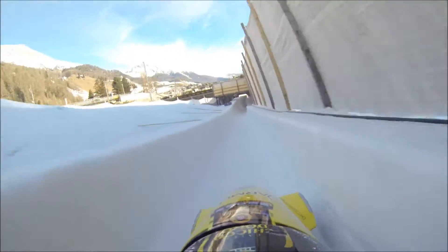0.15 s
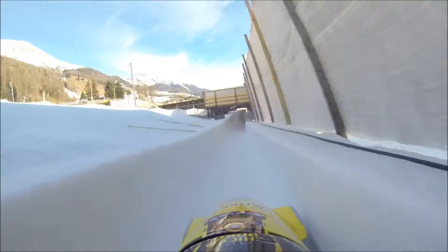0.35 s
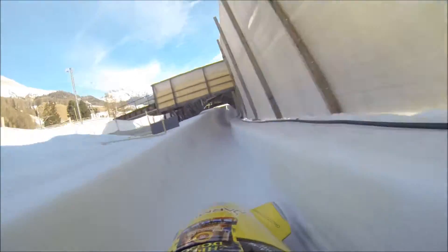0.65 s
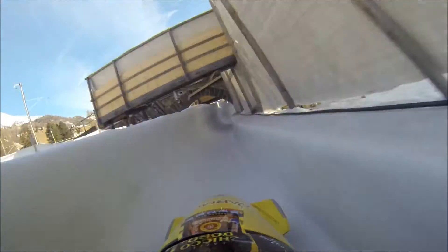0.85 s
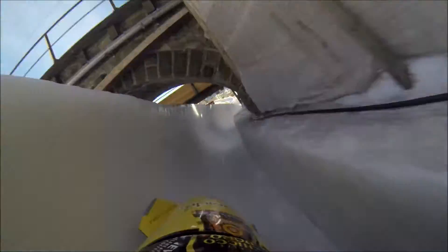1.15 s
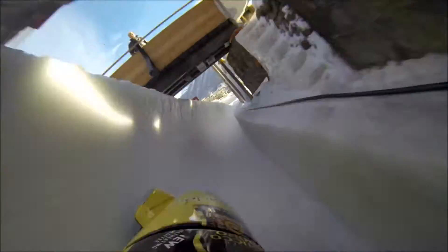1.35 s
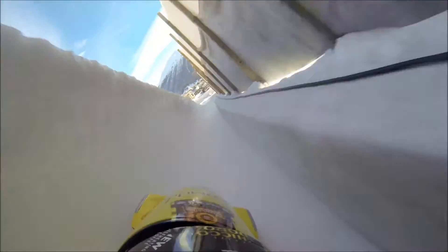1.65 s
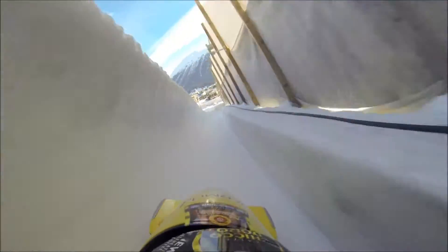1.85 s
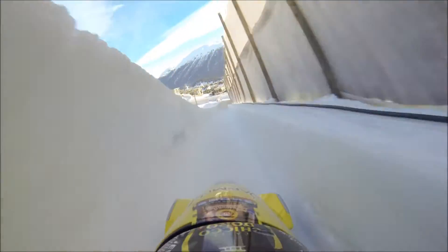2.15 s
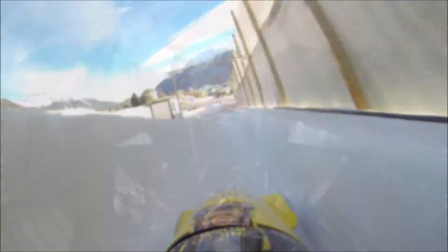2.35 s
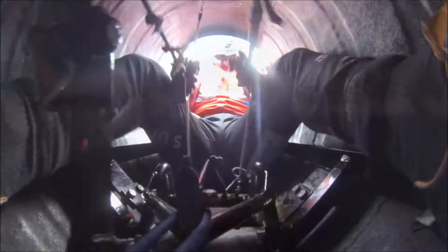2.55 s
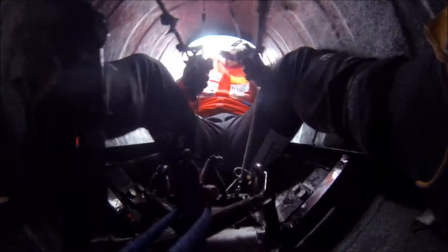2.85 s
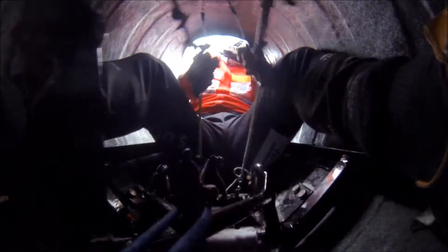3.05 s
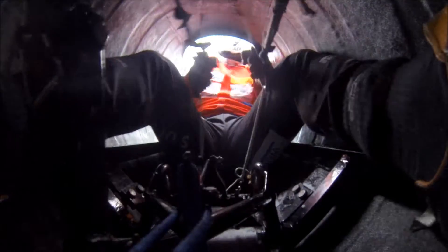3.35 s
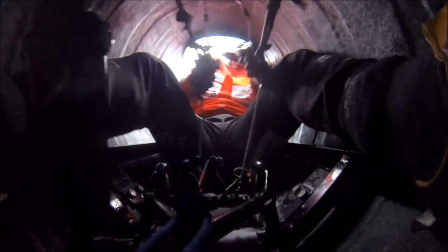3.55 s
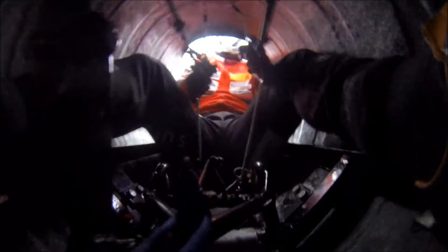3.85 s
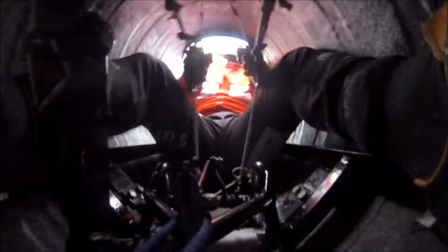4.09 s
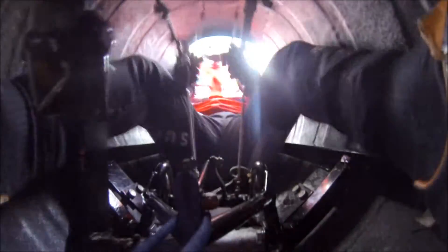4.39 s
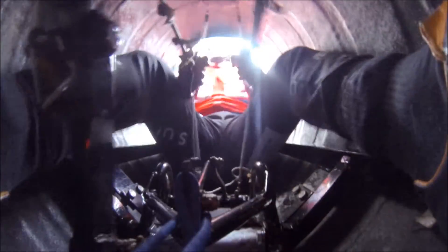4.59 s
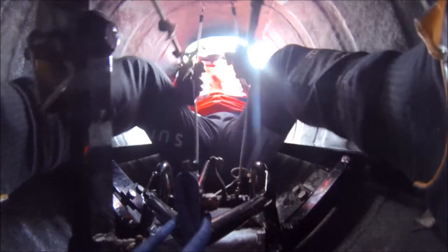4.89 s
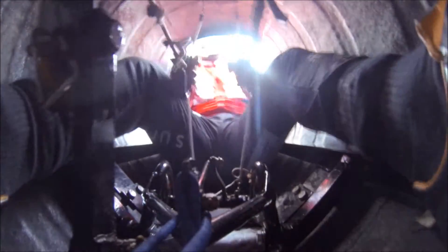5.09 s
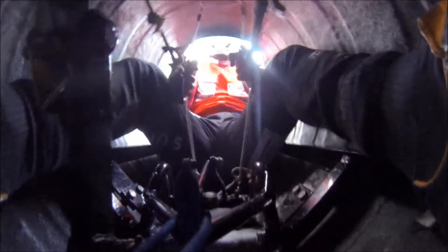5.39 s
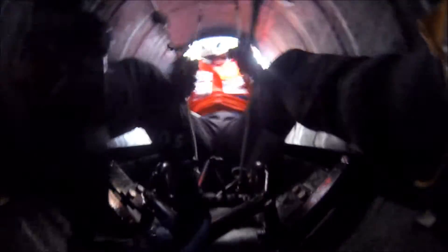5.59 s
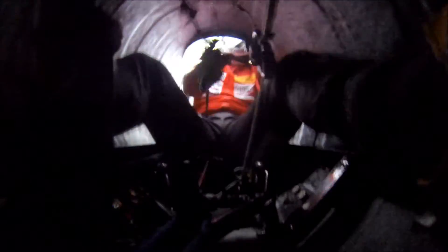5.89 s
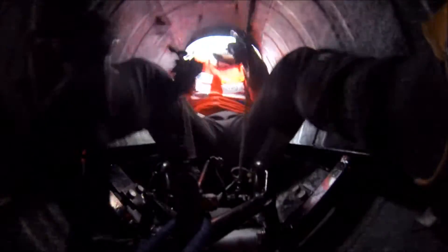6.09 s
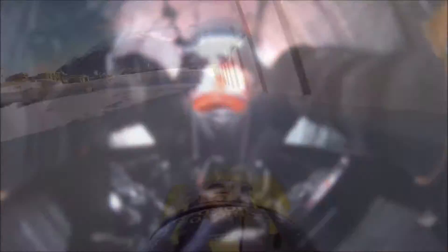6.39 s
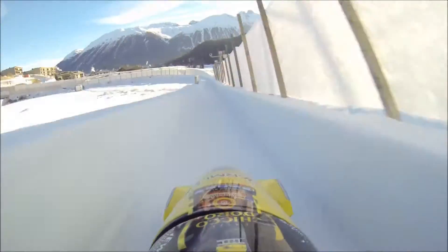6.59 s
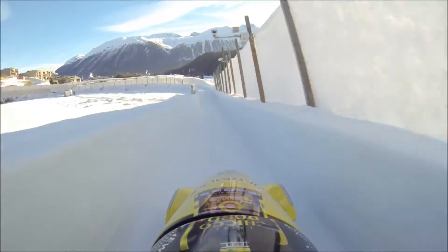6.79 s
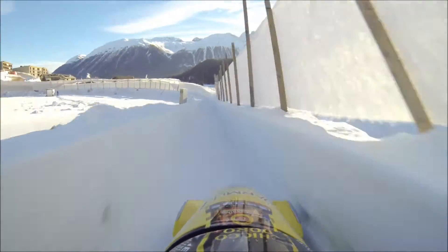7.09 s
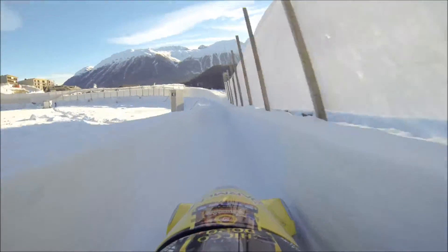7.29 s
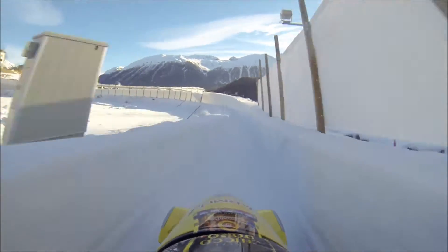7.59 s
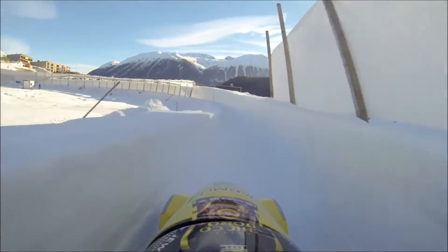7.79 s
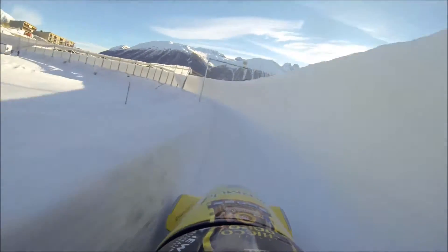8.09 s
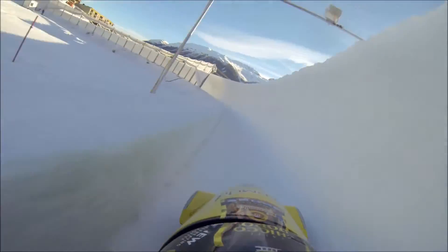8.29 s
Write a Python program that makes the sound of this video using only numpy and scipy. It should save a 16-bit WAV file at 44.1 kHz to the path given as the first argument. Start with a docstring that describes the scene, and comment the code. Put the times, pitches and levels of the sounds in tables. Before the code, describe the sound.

Gusty low wind roar and the steady hiss of steel runners on ice, with rattles and knocks once heard inside the speeding sled's shell.

```python
"""A gusty wind roar and the hiss of steel runners on ice: a bobsled runs down a track, heard from a
cased camera on its nose, then from one inside the cowl, then the nose again, overlapping a quarter second.
Wind is pushes and noise through a spectrum; the scrape is noise and grains shaken by ridges and jolts.
Knocks and chatter ring body modes; single buffets, hull booms, dry ticks and air hiss join them.
A fast limiter ducks everything after each peak."""
import sys
import numpy as np
from scipy import signal
from scipy.io import wavfile
from scipy.ndimage import uniform_filter1d

SR = 44100
rng = np.random.default_rng(int(sys.argv[2]) if len(sys.argv) > 2 else 0)


def wav_record(signal):
    """Record a signal, one row per channel, as 16-bit PCM in the file named by sys.argv[1]."""
    frames = np.transpose(np.atleast_2d(signal))
    bounded = np.clip(frames, -1, 1)
    # unit amplitude maps onto the largest positive 16-bit level
    quanta = np.round(bounded * 32767).astype(np.int16)
    wavfile.write(sys.argv[1], SR, quanta)


N = 372204
HOP, SIZE = 32, 128  # short-time spectrum, samples

# wind spectra, relative: freq_hz, density_db
NOSE_WIND_SPECTRUM = [(8.8, -34), (15, -5), (38, 0.5), (102, -3), (162, -7.5), (311, -11), (395, -16.5),
                      (477, -17.5), (900, -23.5), (1170, -44), (1980, -120)]
COWL_WIND_SPECTRUM = [(8.8, -32), (15, -35), (27, 0), (76, -0.5), (108, -3.5), (157, -9.5), (197, -3),
                      (231, -10.5), (267, -9), (308, -21), (340, -18), (476, -23), (700, -19), (910, -45.5),
                      (1540, -120)]
GUST_S, NOSE_GUST_DB, COWL_GUST_DB = 0.03, 1.5, 1.4
OUTWARD_SHARE = 0.25  # of the eddies; most suck in


def wind(spectrum, turns, push_share, unevenness_db, gust_db, stiffness=0.14):
    """Eddies push the port unevenly over a low gusty roar; the diaphragm stiffens when pushed far."""
    eddies = push_share * clicks(200, unevenness_db, OUTWARD_SHARE)
    roar = evened(coloured(eddies + rng.standard_normal(N), spectrum))
    t = np.arange(0, N + 64, 64) / SR
    gusts_db = gust_db * wander(len(t), GUST_S * SR / 64)
    level = np.hypot(gain_of(ride(1, turns, t) + gusts_db), thuds(t))
    return np.interp(np.arange(N) / SR, t, level) * np.tanh(stiffness * roar) / stiffness


# scrape spectra, relative: freq_hz, density_db
NOSE_SCRAPE_SPECTRUM = [(150, -48.5), (350, 1), (700, -3), (1000, -5), (1350, -17), (2300, -25.5),
                        (4300, -39), (7000, -50.5), (11500, -54.5), (15500, -63)]
COWL_SCRAPE_SPECTRUM = [(150, -42.5), (350, -5), (700, -3), (1100, -4), (1350, -12), (2300, -11.5),
                        (4300, -31.5), (7000, -47), (11500, -54.5), (15500, -68)]
# body and case resonances: freq_hz, width_hz, lift_db
NOSE_RESONANCES = [(1760, 850, 12), (2805, 470, 8), (3360, 820, 8), (4960, 940, 9.5)]
COWL_RESONANCES = [(859, 50, 7.4), (1002, 46, 5.5), (1690, 140, 3.6), (1770, 170, 3.2), (1683, 820, 7.1),
                   (4950, 1230, 7.1)]
CASE_RESONANCES = [(6260, 310, 6.7), (8270, 1300, 13.1), (10370, 980, 8.1), (13300, 790, 4.6)]
# share of random ridges and flicker in the scrape: start_s, share_ratio
ICE_ROUGHNESS = [(0, 1), (2.4, .5), (3.3, 0.33), (3.45, 1), (6.6, 0.8), (8.44, 0.49)]
# runners strike ridges in the ice: start_s, level_db, brightness_db_per_octave
RIDGE_JOLTS = [(0.12, -37, -5), (0.471, -12.5, 2), (2.484, -12.5, 5), (2.706, -27, 6), (2.734, -18, -1),
               (2.768, -33, 7), (2.817, -33, 10), (2.843, -23, 5.5), (2.862, -17.5, 2), (2.882, -35, 10),
               (2.973, -38, 9), (3.045, -32, 7), (3.161, -40, 9), (3.237, -20, 0), (3.247, -14, -0.5),
               (3.286, -35, 5), (3.354, -22, 3), (3.369, -27, 6.5), (3.458, -33, 8.5), (3.527, -26, 7.5),
               (3.543, -16, -3), (3.611, -13.5, -1), (3.625, -16.5, 2.5), (3.769, -16, 5), (3.798, -6, 2.5),
               (3.85, -27, 1), (3.95, -28, 8), (4.04, -35, 10.5), (4.064, -30, 7.5), (4.099, -16, 2),
               (4.142, -16, 3), (4.24, -24, 6.5), (4.276, -22.5, 7), (4.365, -24, 6.5), (4.399, -16, -0.5),
               (4.417, -28, 7), (4.481, -18.5, 3), (4.56, -36, -2), (4.585, -35, 11), (4.614, -21, 4),
               (4.663, -17, 4), (4.738, -22, 4.5), (4.789, -32, 7.5), (4.858, -14.5, 1.5), (4.989, -18, 4),
               (5.074, -25, 2), (5.097, -19.5, 2.5), (5.15, -17, 4), (5.202, -26, 6.5), (5.274, -20, 3.5),
               (5.296, -28, 8), (5.345, -31, 6), (5.393, -27, 5.5), (5.439, -10.5, 0.5), (5.465, -25, 5.5),
               (5.547, -36, -2), (5.575, -23, 4), (5.617, -16, 2.5), (5.635, -13.5, 2.5), (5.688, -32, 5),
               (5.817, -18.5, 4.5), (5.897, -19, 1.5), (6.035, -15.5, 2), (6.084, -25, 4.5),
               (6.125, -27, 3), (6.168, -23, 5.5), (6.211, -30, 7), (6.33, -19, 0), (6.395, -20, 3.5),
               (6.425, -13, -1), (6.455, -17, 4.5), (6.515, -20, 6), (6.58, -20, 5), (7.138, -11.5, 0.5),
               (7.153, -10, 1), (7.196, -21, 4), (7.464, -9.5, 1), (7.491, -6, -2), (7.519, -35, 4),
               (8.03, -22, 2), (8.052, -24, 2)]
SURGE_S, SURGE_DB, JOLT_RISE_S = 0.035, 0.8, 0.0077


def scrape(spectrum, modes, turns, grit, bump, flicker_db, tilt_db, jolt_t60_s):
    """Steel on ice: hiss and grains, shaken by ridges, in drifting patches, ringing through the body."""
    rubbing = evened(rng.standard_normal(N) + grit * clicks(900, 2.16, 0.5))
    hz, t, z = signal.stft(rubbing, SR, nperseg=SIZE, noverlap=SIZE - HOP)
    octaves = np.log2(np.maximum(hz, 500) / 1700)[:, None]
    patches = uniform_filter1d(rng.standard_normal(z.T.shape), 24, axis=0)
    patches = evened(uniform_filter1d(patches, 4, axis=1)).T
    flicker = evened(uniform_filter1d(rng.standard_normal(len(t)), size=16))

    # roughness shows most in the treble
    treble = np.clip(0.5 + 0.37 * octaves, 0.2, 0.9) * np.interp(t, *np.transpose(ICE_ROUGHNESS))
    shake = 1 + bump * treble * bumps(len(t), 110, 1.2, 0.016)
    level_db = ride(2, turns, t) + SURGE_DB * wander(len(t), SURGE_S * SR / HOP)
    level_db = level_db + tilt_db * octaves + 1.13 * patches + flicker_db * treble * flicker
    dip_db = dips(t) * np.clip(0.81 + 0.22 * octaves, 0.3, 1.3)
    field = gain_of(level_db - dip_db) * shake

    for start_s, jolt_db, bright_db in RIDGE_JOLTS:
        near = (t > start_s) & (t < start_s + jolt_t60_s)
        age_s = t[near] - start_s
        blow = (1 - np.exp(-age_s / JOLT_RISE_S)) * gain_of(jolt_db - 60 * age_s / jolt_t60_s)
        field[:, near] = np.hypot(field[:, near], blow * gain_of(bright_db * octaves))

    # unit level: the unshaken rubbing in the main band
    main_band = signal.butter(4, [700, 4000], "bandpass", fs=SR, output="sos")
    unit = np.std(signal.sosfilt(main_band, coloured(rubbing, spectrum, modes)))
    shaken = signal.istft(z * field, nperseg=SIZE, noverlap=SIZE - HOP)[1][:N]
    return coloured(shaken, spectrum, modes + CASE_RESONANCES) / unit


def bumps(frames, per_s, spread_db, t60_s):
    """Small random ridges: sudden rises that die away."""
    size = gain_of(spread_db * np.minimum(rng.exponential(1, frames), 4))
    hits = (rng.random(frames) < per_s * HOP / SR) * size
    return signal.lfilter([1], [1, -10 ** (-3 * HOP / SR / t60_s)], hits)


THUD_SHARE_DB, THUD_DECAY_S = -6.5, 0.02  # share relative to the jolt


def thuds(t):
    """Low shake of the case after each jolt, as an amplitude for the roar."""
    return sum(gain_of(level_db + THUD_SHARE_DB) * (t > start_s)
               * np.exp(-np.maximum(t - start_s, 0) / THUD_DECAY_S)
               for start_s, level_db, _ in RIDGE_JOLTS)


# brief treble dropouts: start_s, length_s, depth_db (before the weight of each layer)
TREBLE_DIPS = [(0.453, 0.013, 8), (2.614, 0.093, 4), (3.073, 0.035, 2.5), (3.263, 0.025, 5),
               (3.645, 0.028, 9), (4.213, 0.031, 8), (6.047, 0.029, 7), (8.165, 0.0045, 7),
               (8.179, 0.037, 7), (8.241, 0.007, 11)]
DIP_FALL_S, DIP_RETURN_S = 0.0033, 0.013


def dips(t):
    """Depth in dB of the brief dropouts; the level returns more slowly than it leaves."""
    depth = 0
    for start_s, length_s, depth_db in TREBLE_DIPS:
        ramps = np.minimum((t - start_s) / DIP_FALL_S, (start_s + length_s - t) / DIP_RETURN_S)
        depth = depth + depth_db * np.clip(ramps + 0.5, 0, 1)
    return depth


# one table per camera turn (nose, cowl, nose): start_s, wind_db, scrape_db
DESCENT_LEVELS = [
    [(0, -20, -35.5), (.25, -23, -37.5), (.43, -21, -34), (.6, -20, -35), (.95, -20.5, -34),
     (1.13, -19, -30.5), (1.21, -18, -32.5), (1.33, -19.5, -36), (1.5, -22, -33.5), (1.75, -21, -33.5),
     (1.95, -21.5, -36), (2.1, -22.5, -36), (2.25, -19.5, -34.5), (2.35, -20.5, -37.5), (2.47, -22.5, -30),
     (2.63, -12, -26.5)],
    [(2.39, -28, -43), (2.48, -10, -26.5), (2.65, -20, -33.5), (2.73, -15.5, -28), (2.87, -18, -40),
     (2.98, -23.5, -36.5), (3.2, -20.5, -36), (3.3, -19.5, -33.5), (3.4, -23, -34), (3.6, -22.5, -32),
     (3.69, -26, -34.5), (3.82, -24.5, -29.5), (4.03, -21.5, -34.5), (4.13, -20, -28), (4.35, -26.5, -34),
     (4.5, -21.5, -29.5), (4.6, -23, -33.5), (4.8, -24.5, -35.5), (4.9, -23.5, -28), (5.1, -25, -35),
     (5.42, -24, -30), (5.56, -26.5, -34.5), (5.7, -23.5, -30), (6.0, -20, -31.5), (6.1, -23, -34.5),
     (6.28, -22, -31.5), (6.37, -21, -35), (6.45, -16, -24), (6.52, -18.5, -35), (6.63, -21, -25)],
    [(6.37, -14.5, -28.5), (6.6, -22, -29.5), (6.7, -18, -30.5), (6.83, -25.5, -36), (7.0, -21.5, -32.5),
     (7.15, -21.5, -29.5), (7.25, -23, -35), (7.33, -19.5, -31), (7.43, -24, -37), (7.51, -18.5, -27),
     (7.57, -22, -36.5), (7.8, -21, -35), (7.97, -21, -35), (8.05, -17, -30), (8.17, -20.5, -34),
     (8.23, -24.5, -38.5), (8.37, -18.5, -35), (8.44, -28, -35.5)],
]


def ride(column, turns, t):
    """One level column of the descent, joined over a camera's turns."""
    rows = np.vstack([DESCENT_LEVELS[k] for k in turns])
    return np.interp(t, rows[:, 0], rows[:, column])


# loose parts knock on the cowl: start_s, level_db (before share), low_vs_high_modes_db
COWL_RATTLES = [(2.4398, -27, 9), (2.4529, -21, 8), (2.4754, -13, -2), (2.4887, -19, -12),
                (2.5122, -16, -12), (2.564, -29, -3), (2.6019, -21, -6), (2.6927, -19.5, 3.5),
                (2.7273, -18, -4), (2.803, -19, 1), (2.8344, -23, 1), (2.8496, -20, -2), (2.8648, -19, -12),
                (2.8916, -20, -2), (2.928, -26, -17), (3.0093, -24, -4), (3.0356, -17.5, -1),
                (3.1505, -21, -10), (3.2008, -25, -2), (3.237, -27, -6), (3.253, -29, -9),
                (3.3094, -28, -2), (3.3337, -20, -6), (3.3587, -27, -6), (3.407, -18, -1),
                (3.5054, -30, -12), (3.538, -24, -3), (3.5817, -23, 2), (3.6118, -21, -9),
                (3.7003, -20, -12), (3.7159, -32, -7), (3.7443, -22, 3), (3.7667, -15, -1),
                (3.802, -12.5, 5), (3.8512, -12.5, -5), (3.9482, -16, -16), (3.9848, -20, 1),
                (4.0042, -20, -4), (4.074, -25, -7), (4.1, -14, -5), (4.1294, -14, -11), (4.1788, -11, -19),
                (4.2397, -20, -10), (4.2626, -17, -4), (4.3095, -29, 0), (4.345, -25, -2),
                (4.3749, -31, -3), (4.4, -18, -8), (4.423, -20, -12), (4.4602, -23, -1), (4.4836, -18, -3),
                (4.5031, -20, -7), (4.5592, -28, -4), (4.5834, -32, -10), (4.6066, -25, -6),
                (4.6226, -24, -8), (4.6437, -17.5, 1), (4.6777, -27, -7), (4.6868, -15.5, -0.5),
                (4.7406, -23.5, -5), (4.7964, -23, -13), (4.8586, -25, 2), (4.9224, -19, -11),
                (4.9518, -23, -1), (4.966, -12.5, -2), (5.0127, -12, -14), (5.0761, -15.5, 1),
                (5.1317, -20, -14), (5.177, -31, -4), (5.197, -19, -6), (5.2165, -21, -10),
                (5.2358, -20, -5), (5.2627, -17, -7), (5.2884, -18, -6), (5.3133, -24, -2),
                (5.3267, -16, -3), (5.3573, -26, -9), (5.3906, -19, -6), (5.439, -17, -13),
                (5.4724, -27, -11), (5.4864, -14, -17), (5.5216, -33, -6), (5.5502, -23, 3),
                (5.5851, -25, -8), (5.5896, -16, -7), (5.632, -20, -5), (5.659, -23, -8), (5.6819, -30, -4),
                (5.7104, -25, 8), (5.7458, -15, -4), (5.764, -31, -13), (5.779, -27, -10),
                (5.7967, -32, -10), (5.8512, -17, -6), (5.887, -23, -4), (5.904, -18, -12),
                (5.941, -35, -3), (5.9538, -23, -5), (6.0326, -25, 8), (6.1444, -27, -12),
                (6.176, -22.5, -14), (6.1895, -32, -12), (6.2332, -27, -8), (6.2468, -24, -14),
                (6.2766, -31, -5), (6.313, -15, -12), (6.338, -22, -9), (6.388, -11, -8), (6.412, -8, -9),
                (6.4502, -7, -15), (6.4698, -9, -7), (6.5125, -29, 1), (6.5619, -30, -5), (6.5734, -25, -8),
                (6.5987, -22, -3)]
# hard knocks on the nose: start_s, level_db (before share), low_vs_high_modes_db
NOSE_CLACKS = [(0.4735, -18, -4), (0.4796, -17, -11), (0.4835, -21, -6), (0.806, -38, -3), (1.037, -32, -6),
               (7.1395, -13, -9), (7.1503, -14, -13), (7.1595, -11, -2), (7.1754, -18, 5), (7.194, -24, 5),
               (7.2175, -22, -8), (7.4635, -21, 3), (7.4665, -19, -7), (7.4744, -14, 0), (7.4925, -20, 6),
               (7.4975, -16, 13), (7.5035, -21, 14), (7.522, -23, 11), (7.768, -27, 3)]
# modes that the knocks ring: freq_hz, level_db, t60_s
COWL_KNOCK_MODES = [(829.5, -6.5, 0.13), (980, 1, 0.054), (1712, 4, 0.049), (1808, 1, 0.11),
                    (2294, -4, 0.016), (2920, -14, 0.0083), (3680, -14, 0.011), (4720, -26, 0.007)]
NOSE_KNOCK_MODES = [(630, -13, 0.015), (827, -4, 0.044), (1010, -1, 0.018), (1360, 5, 0.015),
                    (1660, 8, .012), (1790, 4, 0.012), (2250, 0, 0.012), (2590, -8, 0.0082),
                    (3080, -6, 0.01), (3330, -19, 0.0082)]
RATTLE_CONTACT_S, CLACK_CONTACT_S, RATTLE_SHARE_DB, CLACK_SHARE_DB = 0.0025, 0.002, -6, -3
LOW_MODE_HZ, DETUNE_RATIO, SOFT_START_S = 1200, 0.031, 0.00042  # padded contact: modes swell in


def knocks(table, modes, share_db, contact_s):
    """A short rough contact rings the modes, a little detuned from blow to blow."""
    out, t = np.zeros(N), np.arange(3000) / SR
    hz, mode_db, t60_s = np.transpose(modes)[:, :, None]
    swell = 1 - np.exp(-t / SOFT_START_S)
    chances = rng.standard_normal((len(table), 400 + len(modes)))
    for (start_s, level_db, low_db), chance in zip(table, chances):
        detuned_hz = hz * (1 + DETUNE_RATIO * chance[400:, None])
        ring = swell * gain_of(mode_db - 60 * t / t60_s) * np.sin(2 * np.pi * detuned_hz * t)
        contact = chance[:400] * np.exp(-t[:400] / contact_s)
        blows = signal.fftconvolve(ring, contact[None], axes=1)[:, :3000]
        low = (blows * (hz < LOW_MODE_HZ)).sum(0)
        high = (blows * (hz > LOW_MODE_HZ)).sum(0)
        knock = high / abs(high).max() + gain_of(low_db) * low / abs(low).max()
        out[round(start_s * SR):][:3000] += gain_of(level_db + share_db) * knock
    return out


CHATTER_VS_SCRAPE_DB, CHATTER_PER_S, CHATTER_SPREAD_DB, TAP_START_S = -5, 300, 3, 0.0005


def chatter():
    """Dense small taps ring the cowl from six spots; their level follows the scrape's."""
    out, t = np.zeros(N), np.arange(3000) / SR
    hz, mode_db, t60_s = np.transpose(COWL_KNOCK_MODES)[:, :, None]
    swell = (1 - np.exp(-(t / TAP_START_S) ** 2)) ** 2
    for spot in rng.standard_normal((6, 2, len(COWL_KNOCK_MODES), 1)):
        decay = gain_of(mode_db + 3 * spot[0] - 60 * t / t60_s) / np.sqrt(t60_s)
        ring = swell * decay * np.sin(2 * np.pi * hz * (1 + DETUNE_RATIO * spot[1]) * t)
        taps = clicks(CHATTER_PER_S / 6, CHATTER_SPREAD_DB, 0.5)
        out += signal.oaconvolve(taps, evened(ring.sum(0)))[:N]
    return gain_of(ride(2, [1], np.arange(N) / SR) + CHATTER_VS_SCRAPE_DB) * evened(out)


# single air pushes on the port: centre_s, level_db (before the leak), half_width_ms, direction (+1 out, -1 in)
AIR_BUFFETS = [(0.451, -5, 4.3, -1), (0.904, -9, 0.93, -1), (0.913, -10, 0.78, -1), (0.962, -7.5, 3, 1),
               (2.745, -9, 0.95, -1), (2.854, -22, 1.8, -1), (3.062, -9, 1.3, 1), (3.14, -14.5, 2.6, -1),
               (3.26, -7, 1.1, -1), (3.339, -9, 1.4, -1), (3.46, -20, 3.1, -1), (3.553, -7, 1.2, -1),
               (3.638, -7, 3.5, -1), (3.805, -12.5, 0.71, -1), (3.896, -9, 1.5, -1), (4.053, -9, 1.15, -1),
               (4.184, -7, 1.9, -1), (4.212, -9, 2.8, -1), (4.316, -10.5, 1.7, 1), (4.447, -14, 2.7, -1),
               (4.764, -9, 1.8, -1), (4.88, -21, 2, -1), (4.912, -10, 1.3, -1), (4.993, -13, 1.2, -1),
               (5.154, -10.5, 2, -1), (5.329, -11, 1.1, -1), (5.449, -8.5, 1.6, -1),
               (5.643, -10.5, 1.5, -1), (5.869, -10, 1.1, -1), (5.925, -9, 1.7, -1), (6.048, -11, 1.3, -1),
               (6.165, -13, 1.7, 1), (6.327, -12, 0.9, 1), (6.341, -12.5, 1.4, -1), (6.796, -6, 2.7, 1),
               (7.677, -5, 2.7, 1), (7.744, -0.5, 2.2, 1), (8.065, -8, 3.4, 1), (8.115, -10, 1.5, 1),
               (8.179, -5.5, 3.1, -1)]
LEAK_HZ = 40


def buffets():
    """Smooth single pushes, in or out; each leaks away and rebounds slowly."""
    t = np.arange(N) / SR
    pushes = sum(np.sign(direction) * gain_of(level_db) * np.exp(-((t - centre_s) * 1000 / width_ms) ** 2)
                 for centre_s, level_db, width_ms, direction in AIR_BUFFETS)
    return signal.lfilter([1, -1], [1, -np.exp(-2 * np.pi * LEAK_HZ / SR)], pushes)


# the hull booms on rough patches: start_s, level_db (before share), pitch_hz
HULL_BOOMS = [(0.167, -23, 59.6), (0.248, -13, 96), (1.811, -11, 65.6), (2.387, -7.5, 80), (2.467, -5, 103),
              (2.529, 0.5, 128), (2.739, -9, 72), (2.798, -8, 188), (2.858, -8.5, 91), (3.042, -13, 90),
              (3.249, -9, 96), (3.338, -14, 73), (3.451, -26, 58), (3.82, -14, 61.4), (3.889, -16, 45.8),
              (4.309, -18, 53.8), (4.418, -7, 78.5), (4.489, -13, 197), (4.639, -11, 132),
              (4.729, -18, 64.6), (4.758, -15, 76), (4.88, -8, 130), (4.981, -11, 197), (5.149, -9, 130),
              (5.328, -14, 198), (5.613, -14, 45.8), (5.639, -15, 45.78), (5.749, -11, 71.5),
              (5.86, -14, 149), (6.333, -19, 46.7), (6.412, -7, 80), (6.45, -15, 99.6), (6.499, -12, 69.7),
              (6.598, -15, 46), (6.779, -23, 51.1), (7.843, -13, 70.0)]
BOOM_SHARE_DB, BOOM_CYCLES = -5.5, 1.55  # the envelope peaks at half these cycles


def booms():
    """Short low hull rings that swell within a cycle and die."""
    out, t = np.zeros(N), np.arange(4000) / SR
    for (start_s, level_db, pitch_hz), phase in zip(HULL_BOOMS, rng.random(len(HULL_BOOMS))):
        u = 2 * t * pitch_hz / BOOM_CYCLES
        ring = u * np.exp(1 - u) * np.sin(2 * np.pi * (pitch_hz * t + phase))
        out[round(start_s * SR):][:4000] += gain_of(level_db + BOOM_SHARE_DB) * ring
    return out


# thin dry ticks, three of them at the camera changes: start_s, level_db (before colour), fade_ms
DRY_TICKS = [(2.3945, -35, 0.46), (2.628, -21, 0.59), (6.365, -42, 0.44), (7.194, -38, 1.5), (7.2, -23, 3),
             (7.217, -30, 1.4), (7.221, -33, 1.3), (7.229, -34, 1.5), (7.238, -45, 1.2)]
# tick colour: freq_hz, gain_db
TICK_SPECTRUM = [(300, -5), (2000, 12), (6000, -8.5), (12000, -10), (15500, -13)]


def ticks():
    """Very short noise bursts, bright and dry."""
    out, t = np.zeros(N), np.arange(400) / SR
    noises = rng.standard_normal((len(DRY_TICKS), 400))
    for (start_s, level_db, fade_ms), noise in zip(DRY_TICKS, noises):
        out[round(start_s * SR):][:400] += gain_of(level_db) * noise * np.exp(-(t * 1000 / fade_ms) ** 2)
    return coloured(out, TICK_SPECTRUM)


# air hiss spectrum, relative: freq_hz, density_db
AIR_SPECTRUM = [(1500, -4), (3000, 0), (5000, -9.5), (7000, -25), (11500, -28), (15500, -37)]
# air hiss level: start_s, level_db
AIR_LEVEL = [(0, -65), (2.4, -69), (2.6, -58), (3.3, -76), (3.5, -51.5), (6.4, -54.5), (6.7, -59),
             (8.44, -56)]


def air():
    """Air streaming past the case: smooth hiss through the case resonances, dipping slightly."""
    t = np.arange(N) / SR
    level_db = np.interp(t, *np.transpose(AIR_LEVEL)) - 0.44 * dips(t)
    return gain_of(level_db) * evened(coloured(rng.standard_normal(N), AIR_SPECTRUM, CASE_RESONANCES))


def clicks(per_s, spread_db, outward_share):
    """Sparse clicks of very uneven size, this share of them positive, rms 1."""
    size = gain_of(spread_db * np.minimum(rng.exponential(1, N), 4))
    size = size * np.sign(outward_share - rng.random(N))
    return evened(size * (rng.random(N) < per_s / SR))


def wander(count, steps):
    """Smooth random curve of rms 1 that changes over about this many steps."""
    size = max(round(steps), 1)
    once = uniform_filter1d(rng.standard_normal(count), size=size)
    return evened(uniform_filter1d(once, size=size))


def coloured(x, points, modes=()):
    """Filters x causally: minimum phase, so a click rings after itself."""
    hz = abs(np.fft.fftfreq(16384, 1 / SR))
    log_gain = np.maximum(read(points, hz) + rings(modes, hz), -100) * np.log(10) / 20
    taps = np.fft.ifft(np.exp(np.conj(signal.hilbert(log_gain)))).real[:8192]
    return signal.oaconvolve(x, taps)[:N]


def read(points, hz):
    """A spectrum table at the frequencies hz, interpolated over log frequency."""
    f, value = np.transpose(points)
    return np.interp(np.log(hz + 1), np.log(f + 1), value)


def rings(modes, hz):
    """Lift in dB from a few resonances."""
    return sum(lift_db / (1 + (2 * (hz - f) / width_hz) ** 2) for f, width_hz, lift_db in modes)


def gain_of(db):
    """Decibels to a factor."""
    return 10 ** (np.asarray(db) / 20)


def evened(x):
    """Scales to rms 1."""
    return x / np.sqrt(np.mean(x ** 2) + 1e-20)


NOSE_OFF_S, COWL_ON_S, SWITCH_S = (2.628, 6.367), (2.393, 6.63), 0.0035  # spans; ramp length


def between(span_s, t):
    """1 inside the span, 0 outside, with quick ramps."""
    return np.clip(np.minimum(t - span_s[0], span_s[1] - t) / SWITCH_S + 0.5, 0, 1)


def scene():
    """The two cameras, overlapping at each change, under the layers that run throughout."""
    t = np.arange(N) / SR
    nose = wind(NOSE_WIND_SPECTRUM, [0, 2], push_share=0.81, unevenness_db=2.4, gust_db=NOSE_GUST_DB)
    nose += scrape(NOSE_SCRAPE_SPECTRUM, NOSE_RESONANCES, [0, 2], grit=0.38, bump=0.036,
                   flicker_db=1.3, tilt_db=0.37, jolt_t60_s=0.06)
    cowl = wind(COWL_WIND_SPECTRUM, [1], push_share=1.3, unevenness_db=2.44, gust_db=COWL_GUST_DB)
    cowl += scrape(COWL_SCRAPE_SPECTRUM, COWL_RESONANCES, [1], grit=0.81, bump=0.38,
                   flicker_db=2.5, tilt_db=0.07, jolt_t60_s=0.059)
    nose += knocks(NOSE_CLACKS, NOSE_KNOCK_MODES, CLACK_SHARE_DB, CLACK_CONTACT_S)
    cowl += knocks(COWL_RATTLES, COWL_KNOCK_MODES, RATTLE_SHARE_DB, RATTLE_CONTACT_S) + chatter()
    cameras = (1 - between(NOSE_OFF_S, t)) * nose + between(COWL_ON_S, t) * cowl
    return (cameras + buffets() + booms() + ticks() + air())[None]


LIMIT_DB, RECOVERY_DB_PER_S, DUCK_RATIO, EDGE_HZ = -14.5, 120, 0.7, 15700


def record(dry):
    """A fast limiter pulls the level down after each peak; then a lowpass at the band edge."""
    peak_db = 10 * np.log10(abs(uniform_filter1d(dry[0] ** 2, size=120)) + 1e-12)
    fall_db = np.arange(N) * RECOVERY_DB_PER_S / SR
    held_db = np.maximum.accumulate(peak_db + fall_db) - fall_db
    over_db = np.maximum(held_db - LIMIT_DB, 0)
    ducked = dry / gain_of(DUCK_RATIO * uniform_filter1d(over_db, size=100))
    lowpass = signal.firwin(511, EDGE_HZ, window=("kaiser", 9), fs=SR)
    return signal.oaconvolve(ducked, lowpass[None], "same")


dry = scene()
out = record(dry)
wav_record(out)
```